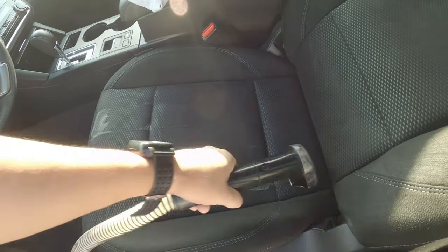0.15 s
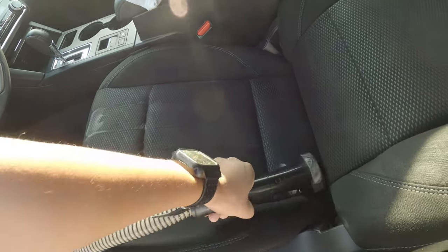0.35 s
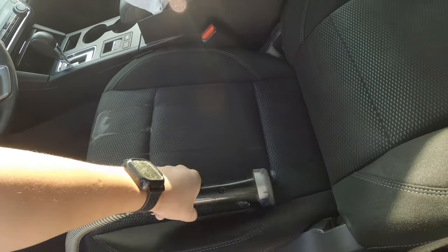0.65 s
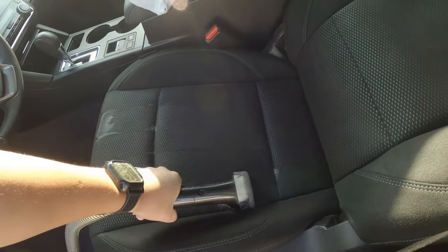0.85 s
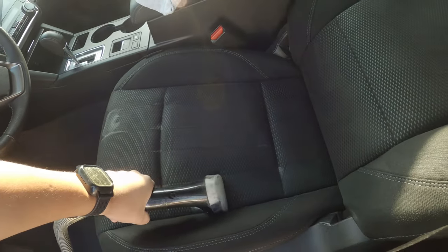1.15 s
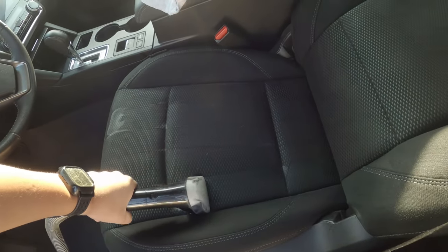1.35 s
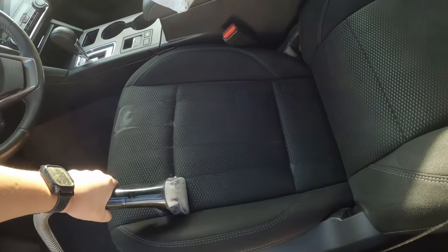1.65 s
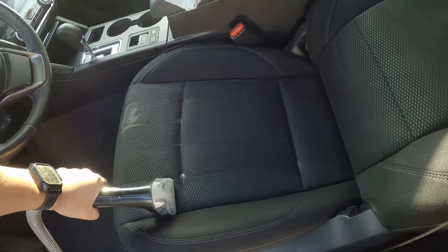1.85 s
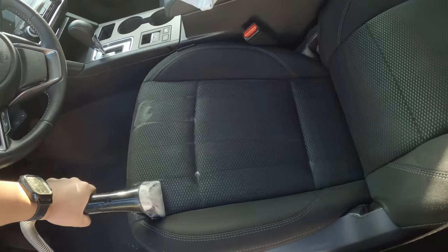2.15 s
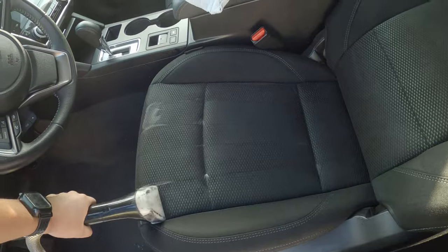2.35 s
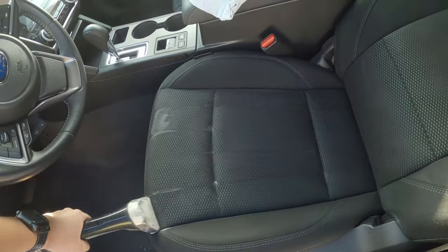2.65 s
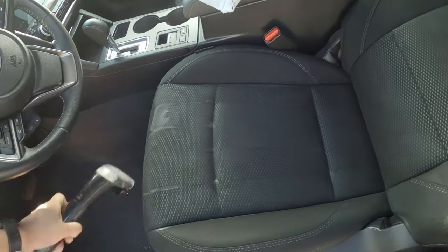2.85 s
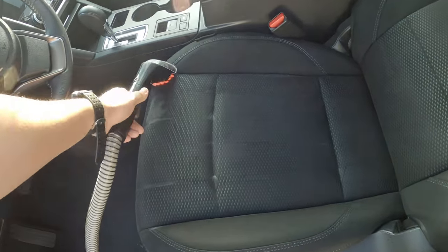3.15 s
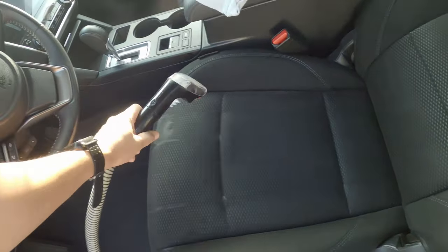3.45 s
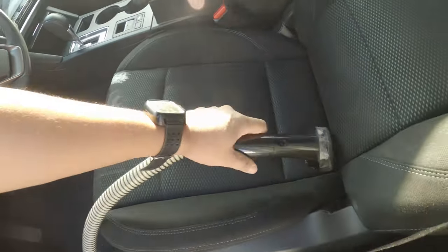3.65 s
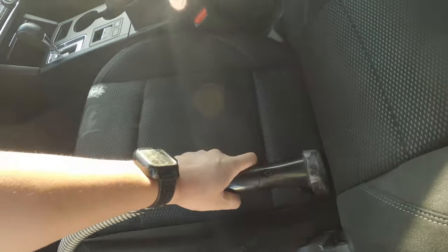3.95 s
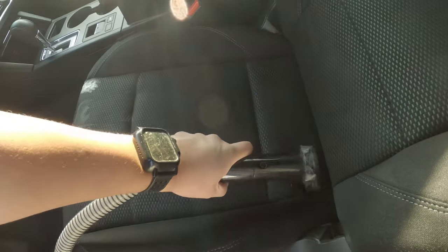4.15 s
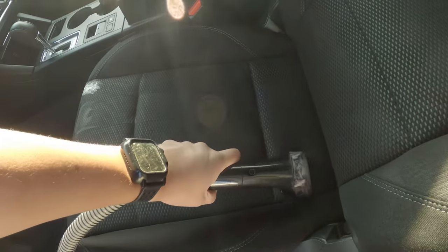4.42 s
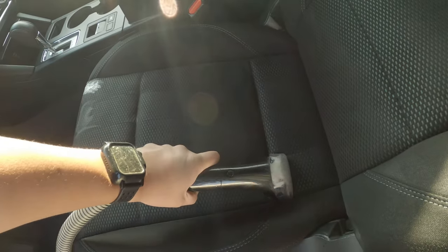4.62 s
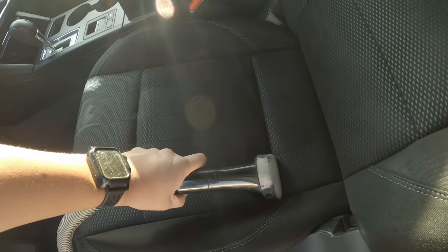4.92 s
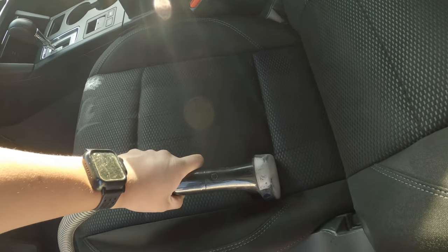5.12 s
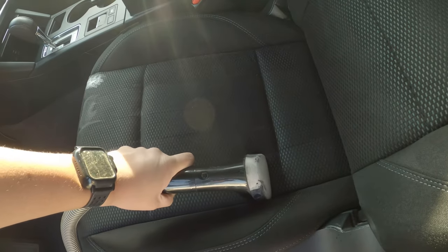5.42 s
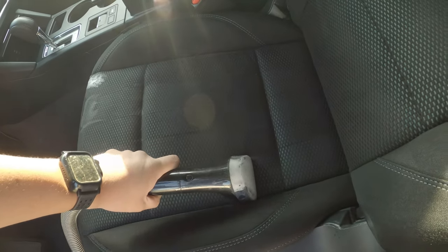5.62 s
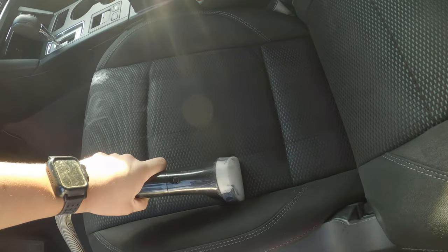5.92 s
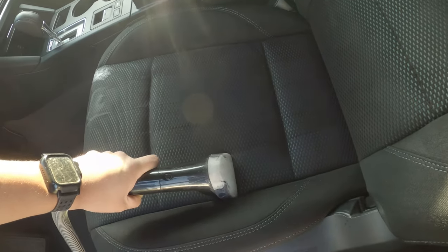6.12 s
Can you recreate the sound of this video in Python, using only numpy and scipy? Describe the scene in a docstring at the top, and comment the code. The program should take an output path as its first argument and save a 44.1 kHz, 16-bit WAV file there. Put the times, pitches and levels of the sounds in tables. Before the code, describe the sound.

The machine is already running at 0 s and never stops: a clear, slightly fluttering motor whine around 1.3 to 1.4 kHz with fainter overtones, a broad exhaust roar and a strong bright hiss of suction, all close in a dry, padded car cabin. Hose rumble leans left over the first half second, with a soft bump near 0.2 s and small water spits at 0.5 and 0.7 s. The whine rises and holds while leaky suction drags along; a faint spit comes at 1.8 s. From about 2 s the hiss swells into a hollow rush, peaking near 2.8 s after a light bump, as the whine sags. A firm padded thump lands at 3.7 s, a smaller one at 3.9. The whine climbs again; tighter, narrower-sounding suction slowly brightens, with a spit at 5.0 and a faint bump at 6.0, still running at 6.3 s.

```python
"""First you hear a motor whine over a broad exhaust roar: a carpet extractor runs beside a car.
Its hand tool is drawn twice over a wet seat; cloth that chokes the nozzle makes the motor speed up.
The whine is a set of sine waves on one rotor speed; the roar and the hissing air are shaped noise.
Short bursts of noise spit like water, and thuds and rumbles are tool and hose on the upholstery."""
import sys
import numpy as np
from scipy import signal
from scipy.fft import rfft, irfft
from scipy.io import wavfile
from scipy.ndimage import uniform_filter1d

SR = 44100
rng = np.random.default_rng(int(sys.argv[2]) if len(sys.argv) > 2 else 0)


def inscribe(sig):
    """Save sig as 16-bit PCM at rate SR to the path in sys.argv[1].

    A 1-D sig is mono; a 2-D sig holds one channel per row.
    Samples are clipped to [-1, 1] before scaling.
    """
    pcm = np.round(np.clip(np.atleast_2d(sig).T, -1, 1) * 32767)
    wavfile.write(sys.argv[1], SR, pcm.astype(np.int16))


N = 276934
TIME = np.arange(N) / SR
SIZE, HOP = 2048, 512  # noise is built in overlapping frames [samples]
FRAMES = np.arange(N // HOP + 4) * HOP / SR  # frame times [s]
BINS = np.fft.rfftfreq(SIZE, 1 / SR)  # frequencies within a frame [Hz]
PORT_LAG_S = .000018  # the machine's sound reaches the left port later


def amp(db):
    """Turns decibels into a gain."""
    return 10 ** (np.asarray(db) / 20)


def unit(x):
    """Scales to rms 1."""
    return x / np.sqrt(np.mean(x ** 2) + 1e-20)


def curves(rows, t):
    """Reads every column of a time table at the times t."""
    s, *columns = np.transpose(rows)
    return [np.interp(t, s, c) for c in columns]


def spectrum(points):
    """Reads a frequency table at the bins, in straight lines on a log axis."""
    hz, value = np.transpose(points)
    return np.interp(np.log(BINS + 1), np.log(hz + 1), value)


def bell(x, centre, width):
    """A hump of height 1 with the given full width at half height."""
    return .5 ** ((2 * (x - centre) / width) ** 2)


def wander(rate_hz):
    """Slow random movement of rms 1, mostly below the given rate."""
    hz = np.fft.rfftfreq(N, 1 / SR)
    slow = rfft(rng.standard_normal(N)) / (1 + (hz / rate_hz) ** 2)
    return unit(irfft(slow, N))


def panned(x, side_db):
    """Makes the left louder than the right by side_db."""
    return np.array([x[0] * amp(side_db / 2), x[-1] * amp(-side_db / 2)])


# How alike the air noise is at the two ports of the microphone: (frequency [Hz], likeness [0-1])
PORT_LIKENESS = [(130, .98), (640, .99), (1410, .96), (3100, .8), (6800, .65), (15000, .4)]
# Balance of the noise between those ports: (frequency [Hz], left minus right [dB])
PORT_BALANCE = [(50, -0.84), (250, 0), (700, 0.35), (1290, 0.28), (2400, 1.7), (5000, 1.2), (12000, -0.37)]


def air(shape_db, patchy_db, like):
    """Turbulence: stereo noise of steady power, coloured by shape_db and mottled by drifting patches."""
    a, b, c, d, patches = rng.standard_normal((5, len(FRAMES), len(BINS)))
    # smoothing over time and frequency makes the patches
    patches = uniform_filter1d(patches, size=6, axis=0)
    patches = unit(uniform_filter1d(patches, size=16, axis=1))
    like = np.clip(like, -1, 1)
    shared = a + 1j * b
    left = shared * np.exp(-2j * np.pi * BINS * PORT_LAG_S)
    right = like * shared + np.sqrt(1 - like ** 2) * (c + 1j * d)
    gain = amp(shape_db)
    gain = gain / np.linalg.norm(gain, axis=-1, keepdims=True)
    z = panned(np.array([left, right]), spectrum(PORT_BALANCE)) * gain * amp(patchy_db * patches)
    x = signal.istft(z.transpose(0, 2, 1), nperseg=SIZE, noverlap=SIZE - HOP)[1][:, :N]
    return x / x.mean(0).std()


# Air resonances of hose, tool and cabin: (frequency [Hz], width [Hz], boost or cut [dB])
AIR_RESONANCES = [(515, 83, 2), (774, 42, 2), (976, 200, 5), (1765, 66, 3.5), (2344, 68, 3), (2635, 140, 3),
                  (3040, 96, -3.5), (3253, 186, 4.5), (4486, 110, 5), (5130, 150, -1.5), (5760, 220, 3),
                  (6870, 180, 4.5), (9320, 330, 1), (9950, 380, -4), (10470, 300, 0.5), (11860, 150, 3.5),
                  (12150, 450, 0.5), (13250, 900, 6)]


def ducts():
    """The colour in dB that the air resonances give to a rush of air."""
    return sum(db * bell(BINS, hz, width) for hz, width, db in AIR_RESONANCES)


# The first stroke leaks and runs off the seat's edge; the second is pressed flat.
# (time [s], gap [0 pressed, 1 leaking, 2 lifted])
NOZZLE_GAP = [(0, 1.23), (.35, 1.15), (1.8, 0.95), (2.15, 1.4), (2.8, 1.62), (3, 1.7), (3.52, 1.54),
              (3.82, 0.76), (4.2, 0.23), (4.7, 0.16), (6.28, 0.14)]


def by_gap(t, pressed, leaking, lifted):
    """Blends three values by the nozzle's gap to the cloth at the times t."""
    gap, = curves(NOZZLE_GAP, t)
    leak, lift = np.clip(gap, 0, 1), np.clip(gap - 1, 0, 1)
    return (1 - leak) * pressed + (leak - lift) * leaking + lift * lifted


# The cloth chokes the nozzle and unloads the fan: (start [s], end [s], choke [0-1])
CHOKED_SPELLS = [(.335, .81, .79), (.81, 2.715, .995), (3.222, 3.44, .525), (4.006, 5.042, .983),
                 (5.114, 6.3, .96)]
FREE_HZ, CHOKED_HZ, START_HZ = 1311, 1385, 1357.5  # blade note: free flow, fully choked, at the outset


def blade_hz(spin_up_s=.22, spin_down_s=.367):
    """The rotor runs up while the nozzle is choked and sags back when air flows freely."""
    choke = sum(share * ((FRAMES >= start) & (FRAMES < end)) for start, end, share in CHOKED_SPELLS)
    hz = [START_HZ]
    for goal in FREE_HZ + (CHOKED_HZ - FREE_HZ) * choke[1:]:
        lag_s = spin_up_s if goal > hz[-1] else spin_down_s
        hz.append(hz[-1] + (goal - hz[-1]) * HOP / SR / lag_s)
    return np.interp(TIME, FRAMES, hz)


def slowed():
    """How far the rotor has sagged: 0 choked, 1 at free flow."""
    return (CHOKED_HZ - blade_hz()) / (CHOKED_HZ - FREE_HZ)


# Blade note in the cabin, before the steady lift note_db: (time [s], level [dB], left minus right [dB])
BLADE_NOTE = [(.2, -52, -2.5), (1.23, -58, -3.5), (2.22, -56, -2), (2.72, -58, 1), (3.35, -51.5, -3),
              (3.76, -54, -4.5), (3.96, -56.5, 1), (4.17, -49.5, 0), (6.28, -50.3, 3.5)]
# Its overtones, some of which escape through the open nozzle:
# (multiple, level pressed [dB], level leaking [dB], level lifted [dB], change at free flow [dB])
BLADE_OVERTONES = [(2, -63.5, -66.5, -57, -6.5), (3, -81, -77, -72, 0.5), (4, -74.5, -65, -64, 3.5),
                   (8, -67, -68.5, -63, 1), (11, -80, -92.5, -89, -1)]


def motor(jitter=0.00052, flutter_db=0.53, overtone_flutter_db=3.0, fading_db=1.5, note_db=0.5):
    """Blade note and overtones on one rotor speed, shaken by turbulent flow; the overtones also fade."""
    hz = blade_hz() * (1 + jitter * wander(rate_hz=14.1))
    turns = np.cumsum(hz) / SR  # blade passes so far
    phase = 2 * np.pi * np.array([turns - hz * PORT_LAG_S, turns])
    level_db, side_db = curves(BLADE_NOTE, TIME)
    note_level_db = level_db + note_db + flutter_db * wander(rate_hz=25)
    out = panned(np.sin(phase), side_db) * amp(note_level_db)
    for multiple, *levels_db, flow_db in BLADE_OVERTONES:
        drift_db = fading_db * np.tanh(wander(rate_hz=4.5))
        drift_db = drift_db + overtone_flutter_db * wander(rate_hz=27)
        level_db = by_gap(TIME, *levels_db) + flow_db * slowed() + drift_db
        out += np.sin(round(multiple) * phase) * amp(level_db)
    return np.sqrt(2) * out  # a sine of rms 1 peaks at the root of 2


# Colour of the exhaust roar: (frequency [Hz], relative level per Hz [dB])
ROAR_COLOUR = [(25, -46), (60, -32), (110, -22), (250, -24), (380, -7.5), (450, -11), (520, 0), (900, 1),
               (1080, -7), (1250, 3.5), (1480, -4.5), (1900, -8.5), (2800, -30.5)]
# Loudness of the roar before gain_db: (time [s], level [dB])
ROAR_LOUDNESS = [(0.06, -59), (1.6, -57), (2.85, -60.5), (4.33, -56.5), (6.2, -57.5)]


def exhaust(gain_db=2.0):
    """Air leaving the machine roars broadly, coloured by the air resonances."""
    level_db, = curves(ROAR_LOUDNESS, TIME)
    roar = air(spectrum(ROAR_COLOUR) + ducts(), patchy_db=0.54, like=spectrum(PORT_LIKENESS))
    return amp(level_db + gain_db) * roar


# Hiss with the nozzle pressed flat, leaking at its edge, and lifted:
# each (frequency [Hz], relative level per Hz [dB])
PRESSED_HISS = [(900, -23), (1900, 0), (2300, 0.5), (2800, 5.5), (3300, 2.5), (4000, -8), (4600, -1),
                (5600, -0.5), (6300, -6.5), (8400, -6.5), (10200, -6), (11200, -4), (12400, -14.5),
                (15700, -14)]
LEAKING_HISS = [(900, -52), (1700, -7), (2150, 8), (2700, 3), (3300, 1), (4000, -1), (4600, -1.5),
                (5600, 0.5), (6300, -2.5), (8400, -10), (9600, -4), (11200, -5), (12400, -16), (15700, -18)]
LIFTED_HISS = [(900, -34), (1700, -12.5), (2200, 2.5), (2700, 6.5), (3300, 0.5), (4000, -4), (4600, -6.5),
               (5700, 2.5), (6350, -11), (7150, 3), (7700, -9.5), (10700, -7), (12000, -15.5), (15700, -19)]


def suction(gain_db=-1.81, gust_db=0.22, slow_fan_db=-2, surge_db=2.0,
            mouth_hz=2330, mouth_width_hz=810, mouth_db=-1, ring_db=8.2,
            peak_s=2.81, rise_s=0.93, fall_s=0.43, dry_from_s=4.17, dry_db_per_s=1):
    """Air tears in at the slot, harder at speed; the gap colours it and the half-open mouth rings."""
    t = FRAMES[:, None]
    # the mouth rings hollow as it slides off the cushion's edge
    swell = [(peak_s - rise_s, 0), (peak_s, 1), (peak_s + fall_s, 0)]
    shape_db = by_gap(t, spectrum(PRESSED_HISS), spectrum(LEAKING_HISS), spectrum(LIFTED_HISS))
    mouth = bell(BINS, mouth_hz, mouth_width_hz)
    shape_db = shape_db + (mouth_db + ring_db * curves(swell, t)[0]) * mouth
    level_db = by_gap(TIME, pressed=-54, leaking=-48, lifted=-49.5)
    level_db = level_db + slow_fan_db * slowed() + surge_db * curves(swell, TIME)[0]
    # the hiss climbs as the cloth dries under the second stroke
    level_db = level_db + dry_db_per_s * np.maximum(TIME - dry_from_s, 0)
    rush = air(shape_db + ducts(), patchy_db=1.0, like=spectrum(PORT_LIKENESS))
    return amp(level_db + gain_db + gust_db * wander(rate_hz=4.5)) * rush


# Slugs of water spit through the slot: (time [s], peak level before sputter [dB], length [s])
WATER_SPITS = [(0.502, -58.5, .05), (0.678, -54, 0.055), (1.767, -60, 0.064), (3.618, -67, 0.073),
               (5.043, -62, 0.095)]
# Colour of the spray: (frequency [Hz], relative level per Hz [dB])
SPRAY_COLOUR = [(400, -60), (1500, -22), (4000, -1), (7000, -4), (11000, -6), (15500, -8)]


def spits():
    """Water breaks into a short, sputtering spray: swells of noise with a quickly shaking level."""
    swell = sum(amp(db) * bell(TIME, s, length) for s, db, length in WATER_SPITS)
    sputter = amp(4 * np.tanh(wander(rate_hz=120)))
    return swell * sputter * air(spectrum(SPRAY_COLOUR), patchy_db=0.5, like=spectrum(PORT_LIKENESS))


# Tool and hose bump the cushion:
# (time [s], base level [dB], time to fade by 60 dB [s], top of the thud [Hz], left minus right [dB])
CUSHION_BUMPS = [(0.217, -52.5, 0.075, 320, 11), (0.466, -63.5, 0.13, 210, 18),
                 (0.534, -63, 0.081, 280, 18), (2.704, -70, .17, 220, -2), (2.748, -56, 0.14, 447, 0),
                 (3.454, -72, 0.2, 170, 0), (3.711, -42.5, 0.098, 895, 6), (3.724, -61, 0.13, 330, 3),
                 (3.913, -51, 0.072, 420, -4), (3.94, -65, 0.24, 80, 3), (5.964, -59.5, 0.31, 322, 1)]


def bumps(rise_s=0.0051, low_hz=95, push_db=16):
    """Padded blows: one quick push, then a rustling thud that the foam soon damps."""
    out = np.zeros((2, N))
    for s, db, t60, top_hz, side_db in CUSHION_BUMPS:
        age = np.maximum(TIME - s, 0)
        u = np.pi * top_hz * age
        # the blow squeezes the air once and lets it rebound
        push = u * (1 - u + u ** 2 / 6) * np.exp(-u)
        low_cut = ((BINS + 1) / (BINS + low_hz)) ** 2
        thud_db = 20 * np.log10(low_cut / (1 + (BINS / top_hz) ** 4))
        fade = amp(-60 * age / t60) * (1 - np.exp(-age / rise_s))
        thud = air(thud_db, patchy_db=4.5, like=0.95) * fade
        out += amp(db) * panned(thud + amp(push_db) * push, side_db)
    return out


# The hose drags along the seat: (start [s], length [s], base level [dB])
HOSE_DRAGS = [(0.017, 0.29, -66.5), (.31, .25, -67.5), (.7, 0.25, -76.5), (1.385, 0.42, -81),
              (6.15, .2, -78.5)]
# Colour of the rubbing: (frequency [Hz], relative level per Hz [dB])
RUB_COLOUR = [(20, -19), (45, 1), (90, 2.5), (200, -1), (350, -2.5), (800, -4), (2000, -54)]


def hose(lumpy_db=0.5, side_db=11, bass_hz=170, rest_db=-90.5, edge_s=0.042):
    """The ribbed hose rubs the upholstery in a lumpy rumble whose bass leans to the left."""
    level = amp(rest_db)
    for start, length, db in HOSE_DRAGS:
        inside_s = np.minimum(TIME - start, start + length - TIME)
        level = level + amp(db) * np.clip(.5 + inside_s / edge_s, 0, 1)
    lumps = amp(lumpy_db * np.tanh(wander(rate_hz=18)))
    rub = air(spectrum(RUB_COLOUR), patchy_db=4.5, like=0.33) * level * lumps
    bass = signal.sosfiltfilt(signal.butter(2, bass_hz, fs=SR, output="sos"), rub)
    return panned(bass, side_db) + (rub - bass).mean(0)  # the rest sits in the middle


# Colour of free air in the lifted tool: (frequency [Hz], relative level per Hz [dB])
OPEN_FLOW_COLOUR = [(60, -20), (150, -7.5), (240, -2), (400, -2.5), (520, -40), (1000, -44)]


def open_flow(level_db=-72.5):
    """Free air rushes low in the hose, more strongly the further the nozzle leaves the cloth."""
    gap, = curves(NOZZLE_GAP, TIME)
    rush = air(spectrum(OPEN_FLOW_COLOUR), patchy_db=4.5, like=spectrum(PORT_LIKENESS))
    return np.clip(gap - 1, 0, 1) * amp(level_db) * rush


def impeller(level_db=-64, below=0.906, width_hz=150):
    """Turbulence in the fan: a steady, narrow rush just under the blade note."""
    centre_hz = below * np.interp(FRAMES, TIME, blade_hz())[:, None]
    shape_db = -10 * np.log10(1 + (2 * (BINS - centre_hz) / width_hz) ** 4)
    return amp(level_db) * air(shape_db, patchy_db=1.5, like=spectrum(PORT_LIKENESS))


def scene():
    """Adds machine, nozzle and handling in the padded cabin."""
    machine = motor() + exhaust() + impeller()
    nozzle = suction() + spits() + open_flow()
    return machine + nozzle + bumps() + hose()


# Stereo width, which shrinks almost to mono above the bass during the second stroke:
# (time [s], side level of bass [dB], of middle [dB], of treble [dB])
STEREO_WIDTH = [(3.82, 1.5, 1, .5), (3.94, 4, -14, -9), (4.06, -8, -49, -49), (5.38, -8, -55, -51),
                (5.6, -7, -39, -9.5), (6.28, 1, -4, -1.5)]


def record(dry, split_hz=(460, 1420), edge_hz=15740):
    """The stereo image narrows for a while, longest in the middle band; the top treble is cut off."""
    mid = dry.mean(0)
    side = dry - mid
    bass, below_treble = (
        signal.sosfiltfilt(signal.butter(6, hz, fs=SR, output="sos"), side) for hz in split_hz)
    bands = bass, below_treble - bass, side - below_treble
    image = mid + sum(band * amp(db) for band, db in zip(bands, curves(STEREO_WIDTH, TIME)))
    lowpass = signal.firwin(1023, edge_hz, window=("kaiser", 9), fs=SR)
    return signal.oaconvolve(image, lowpass[None], "same", axes=1)


dry = scene()
out = record(dry)
inscribe(out)
```